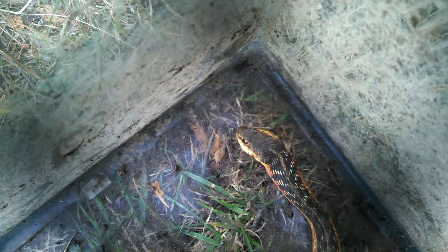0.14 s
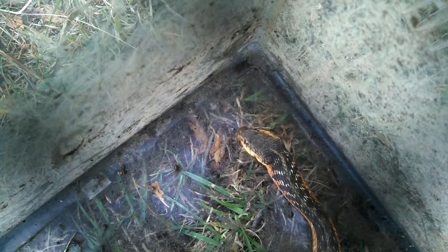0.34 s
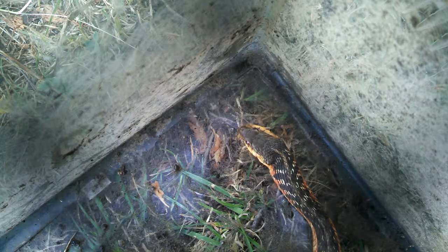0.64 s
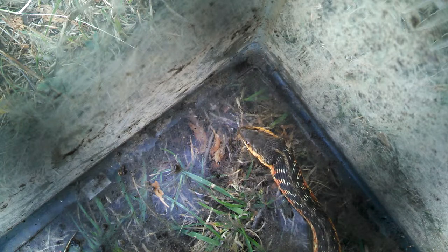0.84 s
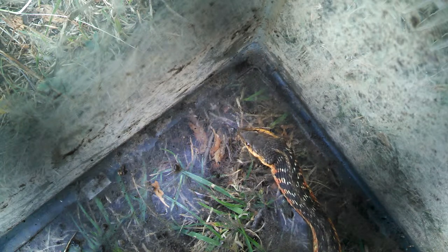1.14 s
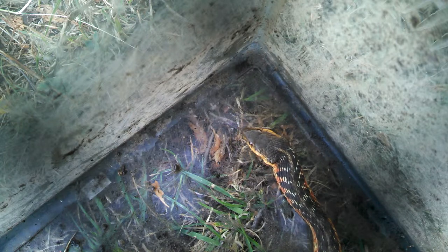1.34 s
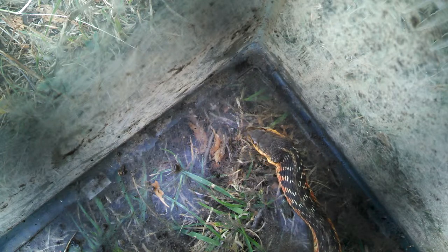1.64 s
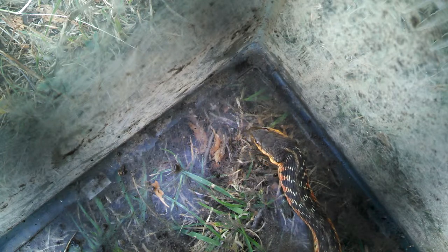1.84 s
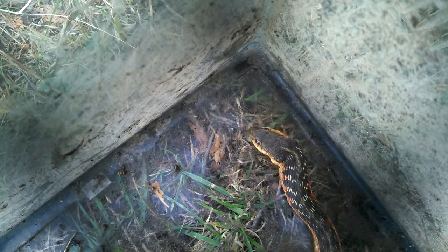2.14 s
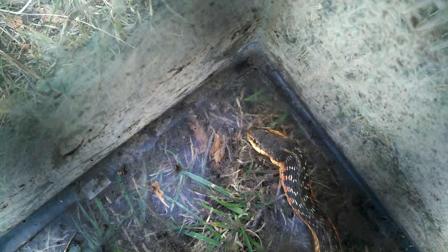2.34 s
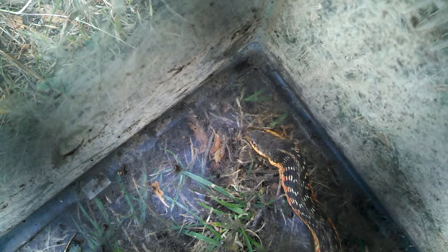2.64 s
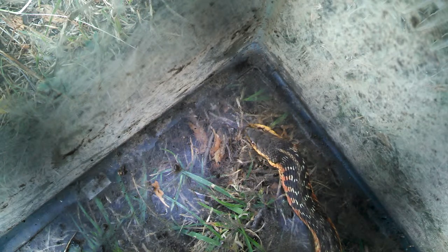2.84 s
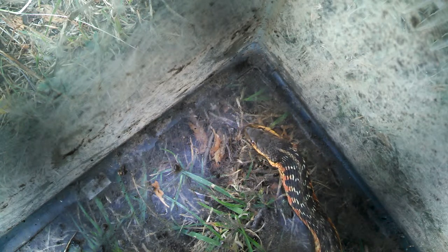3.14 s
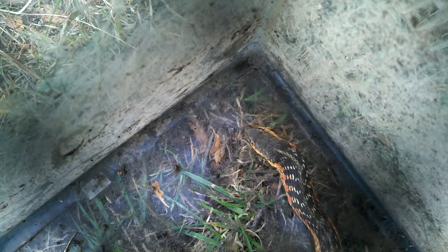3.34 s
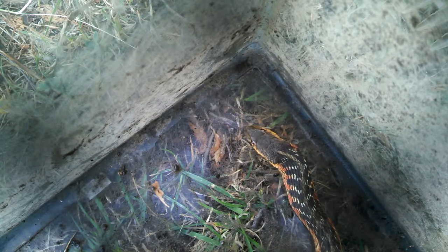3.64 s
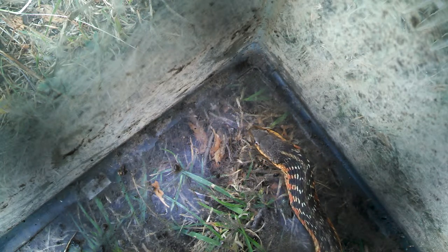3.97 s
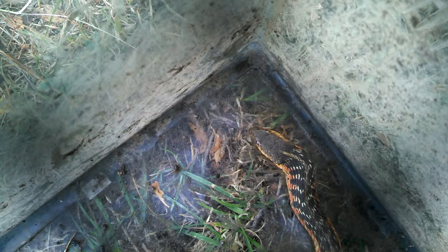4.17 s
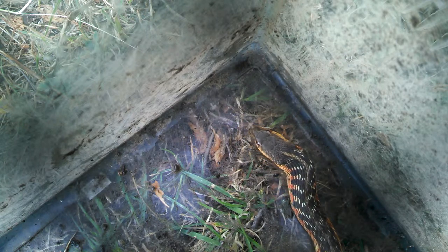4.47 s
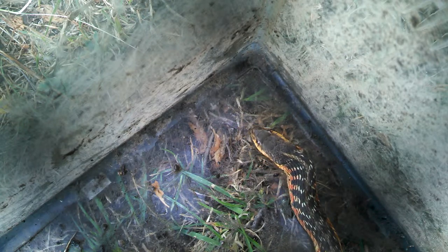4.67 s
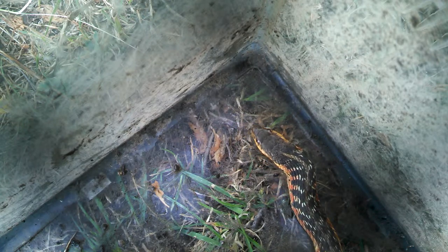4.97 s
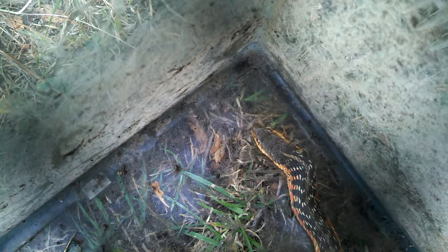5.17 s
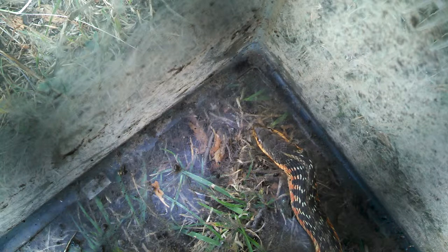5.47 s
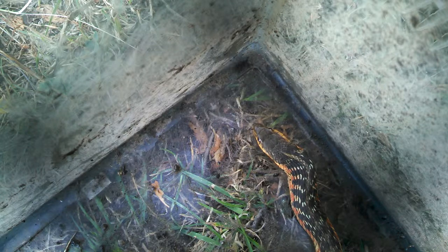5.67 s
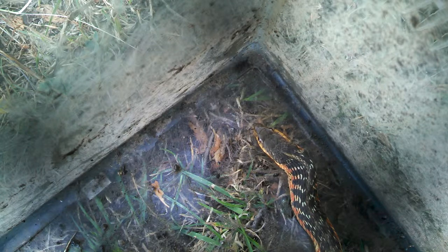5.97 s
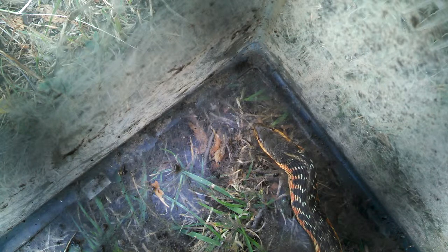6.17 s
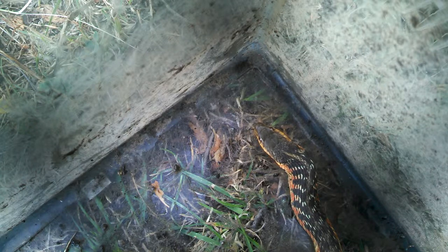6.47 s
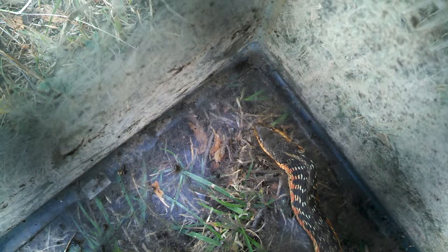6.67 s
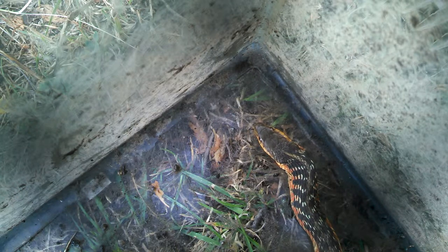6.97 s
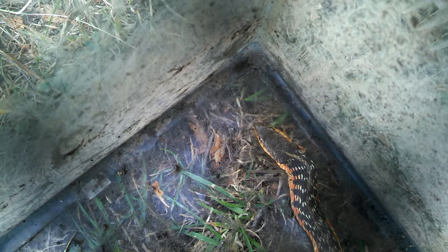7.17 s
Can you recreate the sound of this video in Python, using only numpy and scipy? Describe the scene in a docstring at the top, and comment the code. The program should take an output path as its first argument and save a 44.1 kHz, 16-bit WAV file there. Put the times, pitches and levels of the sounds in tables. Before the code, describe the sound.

Close, squeaky toad croaks trail into little gulps while an engine idles some way off, with faint bird cheeps and straw ticks.

```python
"""Toad in a plastic tub

A toad croaks and gulps four times near a camera's left port: vocal pulses ring its throat, its mouth
and the tub corner. An engine idles some way off, humming at orders of its cycle over a wash of air.
Straw ticks a few times; far birds cheep. The camera widens its stereo by subtracting a delayed copy
of each port from the other."""
import sys
import numpy as np
from scipy import signal
from scipy.io import wavfile
from scipy.ndimage import uniform_filter1d, map_coordinates

SR = 44100
rng = np.random.default_rng(int(sys.argv[2]) if len(sys.argv) > 2 else 0)


def dump_mix(stems):
    """Bounce the given channels to the path in sys.argv[1] as a 16-bit WAV at rate SR."""
    frames = np.atleast_2d(stems).T  # one column per channel
    limited = np.clip(frames, -1, 1)  # hard clip at full scale
    pcm = np.round(limited * 32767).astype(np.int16)
    wavfile.write(sys.argv[1], SR, pcm)


N = 322106


def amp(db):
    return 10 ** (np.asarray(db) / 20)


def add(mix, start_s, sound):
    part = mix[round(start_s * SR):][:len(sound)]
    part += sound[:len(part)]


def along(t, rows):
    """Columns of a curve table, interpolated at times t."""
    time_s, *columns = np.transpose(rows)
    return [np.interp(t, time_s, column) for column in columns]


def drift(rate_hz, count):
    """Slow, smooth random curves."""
    knots = rng.standard_normal((200, count)).T
    at = np.arange(N) / SR * rate_hz
    return np.array([np.interp(at, at[::64], map_coordinates(k, [at[::64]], order=2)) for k in knots])


def decay(x, tau_s):
    """Exponential tail on each impulse."""
    return signal.lfilter([1], [1, -np.exp(-1 / (tau_s * SR))], x)


def ring(x, pitch_hz, width_hz):
    """Resonance at a steady or gliding pitch; a unit click rings at unit amplitude."""
    turn = np.exp(2j * np.pi * np.cumsum(pitch_hz * np.ones(len(x))) / SR)
    return (turn * decay(x / turn, 1 / (np.pi * width_hz))).imag


def ports(turns, level_db, balance_db, lead_rad):
    """A tone at both ports; balance and lead are left minus right."""
    half = np.array([[.5], [-.5]])
    return np.sqrt(2) * amp(level_db + half * balance_db) * np.sin(2 * np.pi * turns + half * lead_rad)


def engine():
    """Tones near multiples of the firing cycle; each wavers as its air paths shift."""
    # idle speed: time_s, cycle_hz
    speed = [(0, 15.97), (3.5, 15.76), (7.31, 15.7)]
    # strongest tone: time_s, level_db
    hum = [(0, -29), (.75, -24), (.95, -27), (1.65, -29.5), (1.93, -23), (2.1, -27.5), (2.7, -25),
           (2.95, -27.5), (3.3, -21.5), (3.45, -29.5), (3.62, -21), (4.05, -23.5), (4.2, -42), (4.5, -26),
           (4.65, -39), (4.8, -23), (5.4, -17.5), (5.75, -21.5), (6, -32), (6.15, -24.5), (6.45, -23.5),
           (6.6, -28.5), (6.8, -20.5), (7.2, -20), (7.35, -15)]
    # its lean to the left port: time_s, balance_db, lead_rad
    hum_lean = [(0, 0.5, 0.054), (4.05, 0.65, 0.17), (4.5, -1, 0.52), (4.85, 1, 0.19), (5.85, 1, 0.16),
                (6.15, 3.5, 0.38), (6.6, 2, 0.62), (6.85, 0.7, 0.18), (7.35, 0.5, 0.12)]
    # other tones: order, level_db, swell_share, lag_s, balance_db, lead_rad
    tones = [(4.986, -49.5, 0.063, 0.024, -0.5, -0.19), (6, -57.5, 0.34, 0.055, 1.5, -0.027),
             (7.05, -46, 0.61, 0.13, 4, 0.055), (8.8, -41, 0.68, 0.024, 3.5, 0.066),
             (10.07, -36.5, 0.98, 0, -0.5, 0.47), (10.99, -32, 1.46, 0.31, 1.5, -0.01),
             (12.88, -40.5, 0.89, 0.44, 4, -0.36), (14.81, -47, 1.2, 0.99, -5.5, -0.6),
             (24.03, -64, 0, 0, 5, -0.4), (25.1, -58.5, 0, 0, 4.5, -0.4)]
    # common swell of the middle tones: time_s, gain_db
    swell = [(0, -13.5), (1.2, -9), (3, -1.5), (4.2, -4), (5.4, -1), (6.2, 0), (7.3, -11)]
    t = np.arange(N) / SR
    cycles = np.cumsum(along(t, speed)[0]) / SR
    flutter, slip = drift(rate_hz=9, count=2)
    out = ports(8 * cycles + 0.014 * slip, along(t, hum)[0] + 0.74 * flutter, *along(t, hum_lean))
    for order, level_db, swell_share, lag_s, balance_db, lead_rad in tones:
        flutter, slip, sway, skew = drift(rate_hz=7, count=4)
        turns = order * cycles + 0.12 * slip + rng.random()
        tone_db = level_db + swell_share * along(t - lag_s, swell)[0] + 2.64 * flutter
        out += ports(turns, tone_db, balance_db + 1.7 * sway, lead_rad + 0.17 * skew)
    return out


def wash():
    """Air and rumble in faint drifting patches; the ports share the bass and differ higher up."""
    # noise spectrum: freq_hz, density_db, balance_db (left minus right), coherence (0-1)
    spectrum = [(30.2, -83, 6, .92), (59, -61.5, -3, 1), (105, -53, 2, 0.93), (180, -54, 2, 1),
                (231, -68.5, -2.5, 0.98), (280, -71.5, -9, 0.38), (390, -71.5, 8, 0.71),
                (442, -80, -15.5, 0.28), (754, -81, 11, 0.27), (855, -86, -11.5, 0.18),
                (1354, -87, -1.5, 0), (2010, -93, -5.5, 0), (3540, -99, -6.5, 0), (7510, -107, -1.5, 0.02),
                (10430, -122, 2.5, .05), (13400, -117, 9, .05)]
    # one swell of the midrange: time_s, gain_db
    swell = [(0, -1), (5.5, 0.5), (6.05, 3), (6.5, 1.5), (7.35, -0.5)]
    swell_hz, swell_width_oct = 1200, 0.64
    bin_hz, t, (common, separate) = signal.stft(
        rng.standard_normal((N, 2)).T, SR, nperseg=2048, noverlap=1536)
    bin_hz = bin_hz[:, None] + 1  # keeps the log finite
    freq_hz, *columns = np.transpose(spectrum)
    density_db, balance_db, coherence = (np.interp(np.log(bin_hz), np.log(freq_hz), c) for c in columns)
    patches = uniform_filter1d(rng.standard_normal(common.T.shape).T, size=20, axis=0)
    patches = uniform_filter1d(patches, size=8, axis=1)
    right = coherence * common + np.sqrt(1 - coherence ** 2) * separate
    pair = np.array([common * amp(balance_db / 2), right * amp(-balance_db / 2)])
    swell_db = along(t, swell)[0] * np.exp(-(np.log2(bin_hz / swell_hz) / swell_width_oct) ** 2)
    pair *= amp(density_db + swell_db + 0.7 * patches / patches.std()) * np.sqrt(SR / 2)
    return signal.istft(pair, SR, nperseg=2048, noverlap=1536)[1][:, :N]


def voice(croak, rasp_hz, throat_db=5, throat_width_hz=280, puff_db=-16):
    """Vocal pulses, uneven when rough and in threes when strained, ring throat, mouth and tub."""
    # tub corner resonances: pitch_hz, width_hz, gain_db
    tub_modes = [(1032, 36, -17.5), (1347, 224, -7), (1900, 51, -11), (2540, 430, 4), (2885, 236, 0.5),
                 (3620, 305, -1.5), (4540, 470, -2.5), (5670, 450, -4.5), (6560, 740, -11),
                 (7180, 220, -15.5), (12500, 3200, -34)]
    start_s, end_s = croak[0][0], croak[-1][0]
    t = np.arange(start_s, end_s + 0.047, 1 / SR)
    rate_hz, rough, effort_db, throat_hz, tilt_db_oct, rasp_db, stress = along(t, croak)
    jitter, shimmer, air = rng.standard_normal((len(t), 3)).T
    step = rate_hz * (1 + 2.5 * rough * uniform_filter1d(jitter, size=60)) / SR
    turns = np.cumsum(step) - step[0]
    pulse_index = np.floor(turns)
    strength = np.diff(pulse_index, prepend=-1) * (t <= end_s) * amp(effort_db + 4 * rough * shimmer)
    strength *= 1 + stress * np.cos(2 * np.pi * pulse_index / 3)
    early = np.clip(turns % 1 / step, 0, 1)  # a pulse falls between two samples
    pulses = strength * (1 - early) + np.roll(strength * early, -1) * (t < t[-1])
    pulses[0] = strength[0]
    puffs = air * decay(strength * rough, tau_s=0.0042)  # rough pulses let out air
    drive = pulses + amp(puff_db) * puffs
    tub = np.zeros(len(t))
    for k, (pitch_hz, width_hz, gain_db) in enumerate(tub_modes):
        tilt_db = tilt_db_oct * np.log2(max(pitch_hz / 2000, .62))
        tub += (-1) ** k * ring(drive * amp(gain_db + tilt_db), pitch_hz, width_hz)
    throat = amp(throat_db) * ring(drive, throat_hz, throat_width_hz)
    breath = air * decay(strength * rough * amp(rasp_db), tau_s=0.0097)
    mouth = pulses * amp(rasp_db) + amp(-13) * breath
    rasp = ring(mouth, rasp_hz[0], width_hz=800) - ring(mouth, rasp_hz[1], width_hz=800)
    rasp += amp(-14) * ring(mouth, pitch_hz=12800, width_hz=1500)
    return start_s, .5 * (tub + throat) + rasp


def fizz(length_s=.03, above_hz=10500, gain_db=-56):
    """Brief thin hiss above 10.5 kHz, a coder-like fizz during the first croak."""
    highpass = signal.butter(6, above_hz, "high", fs=SR, output="sos")
    noise = signal.sosfilt(highpass, rng.standard_normal(round(length_s * SR)))
    return amp(gain_db) * noise * np.hanning(len(noise))


def gulp(start_s, length_s, effort_db, throat_hz, tilt_db_oct):
    """A few pulses, near every third swing of the throat."""
    rough, rasp_db, stress = .2, -37, 0
    curve = [(time_s, throat_hz / 3, rough, db, throat_hz, tilt_db_oct, rasp_db, stress)
             for time_s, db in [(start_s, effort_db), (start_s + length_s, effort_db - 0.5)]]
    return voice(curve, rasp_hz=(11000, 8570), throat_db=4, throat_width_hz=250, puff_db=-12.5)


def toad():
    """Croaks and gulps echo between the tub walls; the far port gets mostly echo."""
    # voice curves, one per croak, two for the first:
    # time_s, rate_hz, rough (0-1), effort_db, throat_hz, tilt_db_oct, rasp_db, stress (every third pulse)
    croaks = [
        [(.007, 38.4, 0.43, -35.5, 2270, 3, -1, 0), (.034, 71.9, 0.44, -36, 2220, 1, -1.5, 0),
         (.086, 101.9, 0.38, -30, 2200, 4, -4, 0), (.091, 588, 0.22, -31, 1800, 4, -26, 0.5),
         (.105, 599.6, 0.19, -27, 1840, -2, -28, 0.62), (.11, 589, 0.37, -35, 1760, 2, -24, 0.71),
         (.116, 585, 0.28, -28, 1820, 0.5, -22, 0.34), (.15, 634, 0.19, -29, 1980, -4, -24, 0.35),
         (.156, 497, 0.68, -39, 1900, -4, -18, .3)],
        [(.169, 399, 0.44, -29, 2200, -6, -28, .3), (.19, 258.6, 0.36, -35, 1800, -8, -24, .2),
         (.2, 169.8, 0.25, -30, 1530, -8, -26, 0), (.232, 161.4, .3, -31, 1330, -9, -30, 0)],
        [(3.72, 150.2, 0.11, -45, 2000, 1, -18, 0), (3.752, 319, .05, -39, 1900, 0.5, -13, 0),
         (3.794, 559, .03, -36, 2150, 1.5, -12, 0), (3.807, 544, 0.069, -39.5, 2180, 2, -14, 0),
         (3.822, 572, 0.025, -35, 2090, 2, -10, 0), (3.84, 562, .04, -37, 2200, -1, -12, 0),
         (3.85, 524, 0.0285, -36.5, 2070, 4.5, -11, 0), (3.884, 540, .03, -34.5, 2130, 1, -11, 0),
         (3.9, 713, 0.14, -30.5, 1970, 1.5, -19, 0.095), (3.912, 771, 0.12, -31.5, 2070, -1, -25, 0.68),
         (3.94, 758, 0.084, -29, 2050, 0, -32, 0.67), (3.952, 772, 0.17, -32.5, 2030, 0, -34, 0.71),
         (3.961, 740, 0.093, -26.5, 2190, -2, -33, .4), (3.965, 737, .3, -40, 1550, -1, -32, .2),
         (3.98, 710, .4, -50, 1500, -4, -32, 0.15)],
        [(5.165, 149, 0.43, -42, 1600, 1.5, -5, 0), (5.197, 239, 0.38, -41.5, 1700, 5, -13, 0.023),
         (5.203, 605, 0.25, -38, 2100, 1.5, -20, .3), (5.225, 535, 0.31, -36.5, 1800, -2, -23, .3),
         (5.244, 470, 0.099, -28.5, 1460, -9.5, -31, .3), (5.254, 424, 0.26, -37, 1370, -10, -30, .2),
         (5.275, 301, .5, -47, 1390, -9, -27, 0.012)],
        [(6.85, 139.2, 0.28, -44, 2000, -4, -12, 0), (6.872, 200, 0.31, -36, 2000, -1, -13, 0),
         (6.877, 648, 0.23, -37.5, 2000, -2.5, -21, .4), (6.887, 656, 0.27, -32, 1950, -3, -26, .4),
         (6.891, 376, 0.45, -47, 1950, -6, -24, 0), (6.905, 303, .55, -46, 1950, -2, -25, 0)],
    ]
    # open-mouth resonances, one row per curve: lower_hz, upper_hz
    rasps = [(7370, 8250), (8600, 9250), (8660, 9300), (7650, 8100), (7060, 7800)]
    # gulps after the croaks: start_s, length_s, effort_db, throat_hz, tilt_db_oct
    gulps = [(0.239, 0.011, -37, 1057, -16), (4.009, 0.004, -27.5, 1854, -3.5),
             (4.031, 0.002, -27, 2180, -5), (4.034, 0.0021, -30, 2004, -9), (4.043, 0.0018, -29, 2210, -9),
             (4.049, 0.0071, -28.5, 1949, -11), (4.059, 0.009, -40, 1044, -19),
             (4.068, 0.013, -47, 1920, -12), (5.305, 0.0075, -31, 1854, -16),
             (5.318, 0.0027, -33, 1970, -16), (5.324, 0.005, -35, 2140, -18),
             (5.328, 0.0057, -32, 1042, -18), (6.926, 0.0028, -32.5, 2490, -5.5),
             (6.935, 0.0041, -31.5, 2095, -13), (6.941, 0.012, -30.5, 1652, -11),
             (6.957, .006, -35, 1690, -12), (6.97, 0.011, -33.5, 1936, -18),
             (6.985, 0.007, -34.5, 1057, -20)]
    echo_t60_s, echo_db, far_db, far_delay_samples = .11, -12, -23, 8
    near = np.zeros(N)
    for croak, rasp_hz in zip(croaks, rasps):
        add(near, *voice(croak, rasp_hz))
    add(near, start_s=.07, sound=fizz())
    for row in gulps:
        add(near, *gulp(*row))
    t = np.arange(4000) / SR
    walls = rng.standard_normal((2, len(t))) * amp(-60 * t / echo_t60_s) * (t > .001)
    walls /= np.linalg.norm(walls, axis=1)[:, None]
    echoes = signal.oaconvolve(near[None], walls, axes=1)[:, :N]
    far = amp(far_db) * np.roll(near, far_delay_samples)
    return np.array([near, far]) + amp(echo_db) * echoes


def straw():
    """Dry ticks: a wideband snap with two broad resonances."""
    # ticks in the straw: start_s, gain_db
    ticks = [(0.3234, -46), (2.1944, -43), (2.306, -42), (5.3548, -45.5), (6.202, -45.5)]
    t60_s = 0.045
    left, t = np.zeros(N), np.arange(600) / SR
    for start_s, gain_db in ticks:
        snap = signal.lfilter([1, -.6], [1], rng.standard_normal(len(t))) * amp(-60 * t / t60_s)
        high = ring(snap, pitch_hz=6900, width_hz=2100)
        low = ring(snap, pitch_hz=3800, width_hz=1800)
        add(left, start_s, amp(gain_db) * (0.26 * snap + 0.24 * high + 0.27 * low))
    return np.array([left, 0.22 * left])


def birds():
    """Short far whistles, rising slightly, blurred on the way through leaves."""
    # whistles: start_s, length_s, pitch_hz, level_db, blur (0-1)
    cheeps = [(1.335, 0.026, 5200, -64, .8), (1.365, 0.028, 5010, -61, 0.4), (1.721, .022, 3718, -60.5, .3),
              (1.792, 0.028, 3980, -59.5, .1), (1.822, 0.035, 4030, -62.5, .1)]
    left = np.zeros(N)
    for start_s, length_s, pitch_hz, level_db, blur in cheeps:
        t = np.arange(0, length_s, 1 / SR)
        stray_rad = .25 * blur * np.cumsum(uniform_filter1d(rng.standard_normal(len(t)), size=60))
        whistle = np.sin(2 * np.pi * pitch_hz * (t + 0.35 * t ** 2) + stray_rad)
        add(left, start_s, amp(level_db) * whistle * signal.windows.tukey(len(t), .5))
    return np.array([left, .6 * left])


def scene():
    return toad() + engine() + wash() + birds() + straw()


def record(dry):
    """Camera: each port minus a delayed copy of the other, a more sensitive right side, a band limit."""
    cross_gain, cross_delay_samples = .9, 16
    right_over_left_db, cutoff_hz = 1.5, 15550
    crossed = np.pad(dry[::-1], ((0, 0), (cross_delay_samples, 0)))[:, :N]
    wide = (dry - cross_gain * crossed) * amp([[-right_over_left_db / 2], [right_over_left_db / 2]])
    lowpass = signal.firwin(511, cutoff_hz, window=("kaiser", 9), fs=SR)
    return signal.oaconvolve(wide, lowpass[None], "same")


dry = scene()
out = record(dry)
dump_mix(out)
```